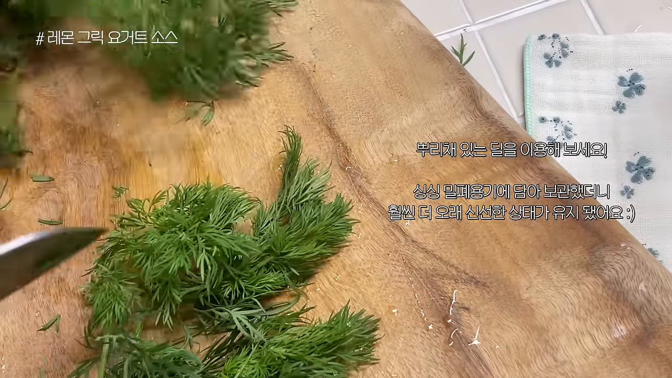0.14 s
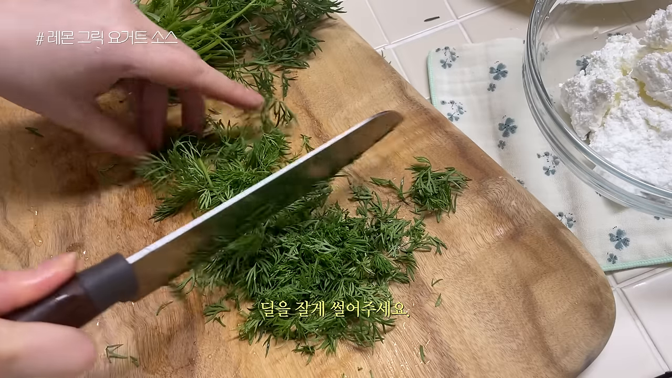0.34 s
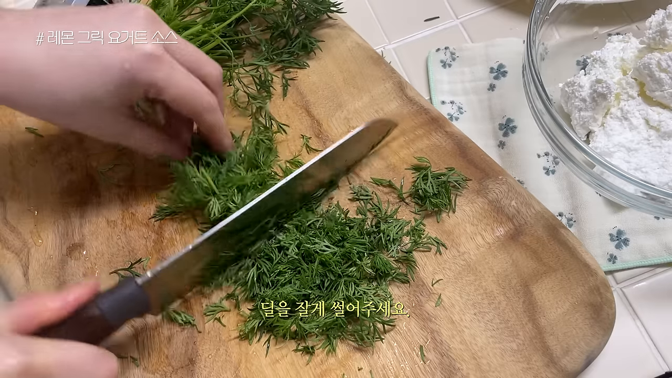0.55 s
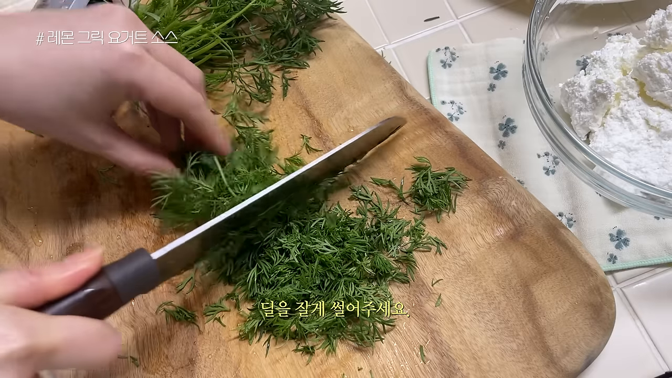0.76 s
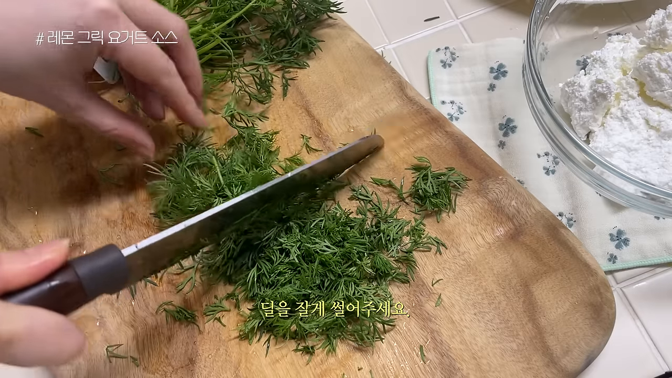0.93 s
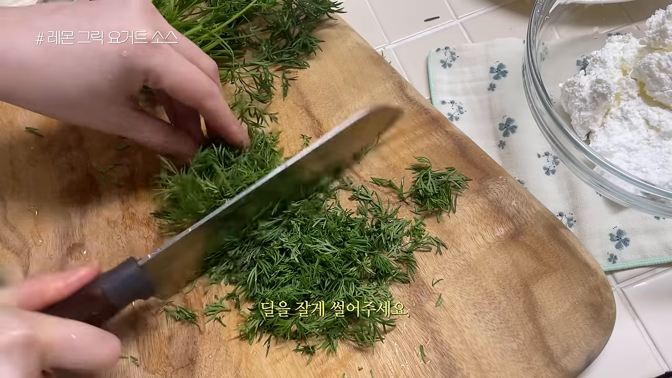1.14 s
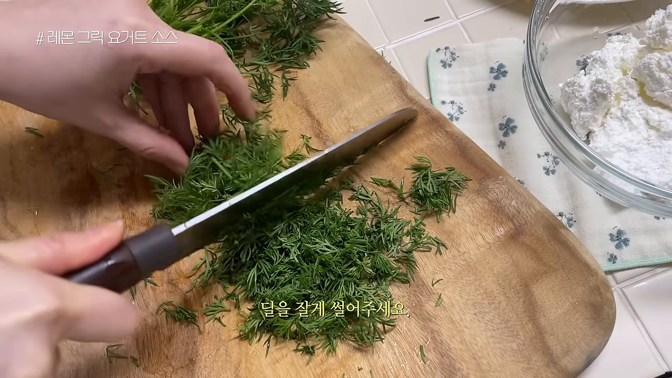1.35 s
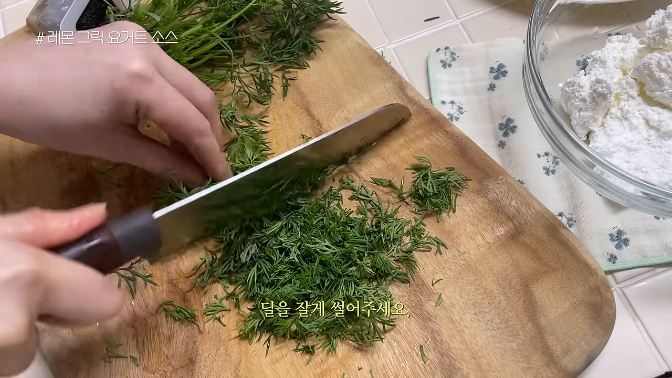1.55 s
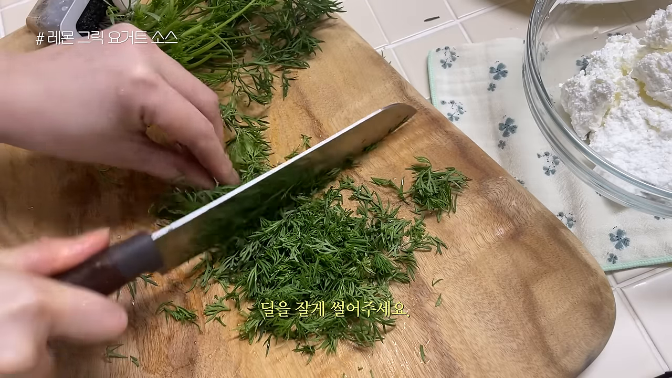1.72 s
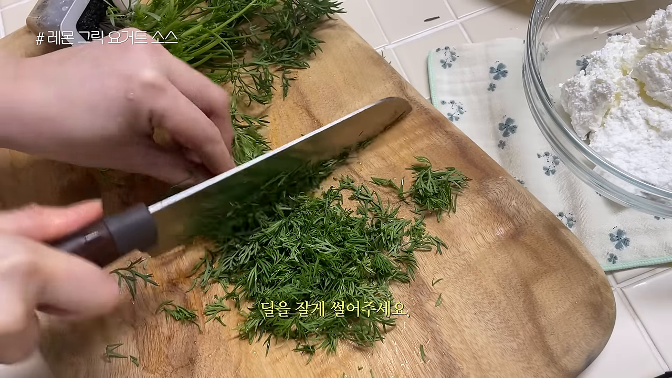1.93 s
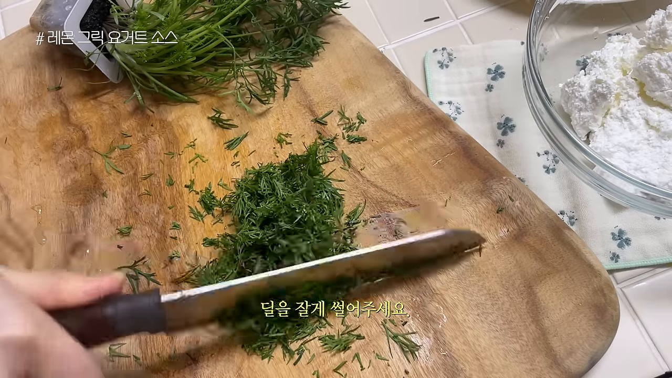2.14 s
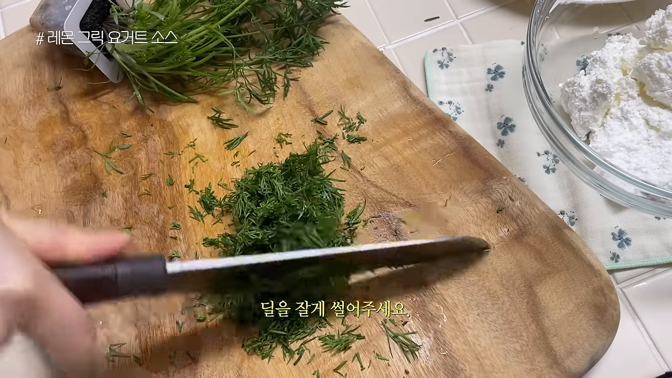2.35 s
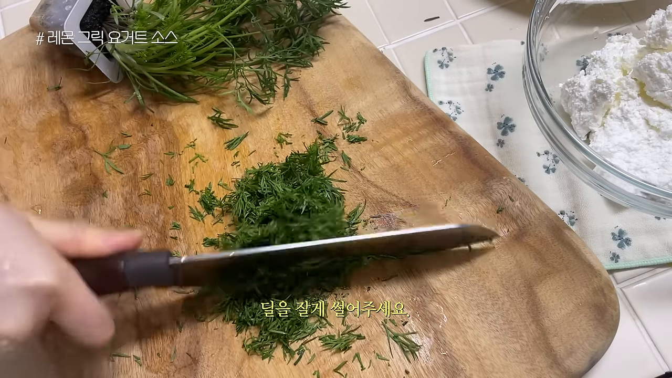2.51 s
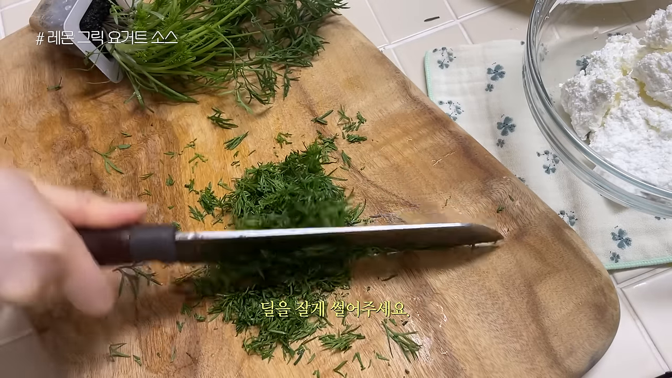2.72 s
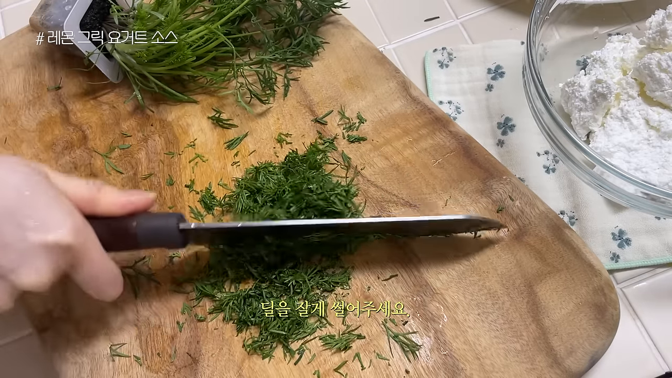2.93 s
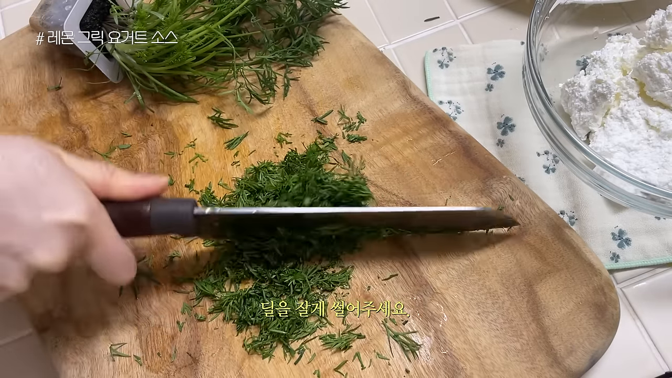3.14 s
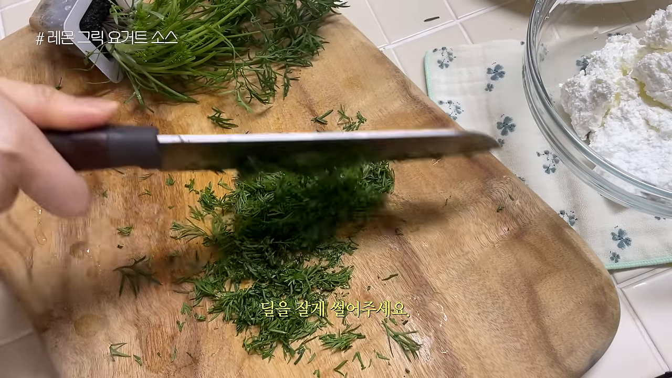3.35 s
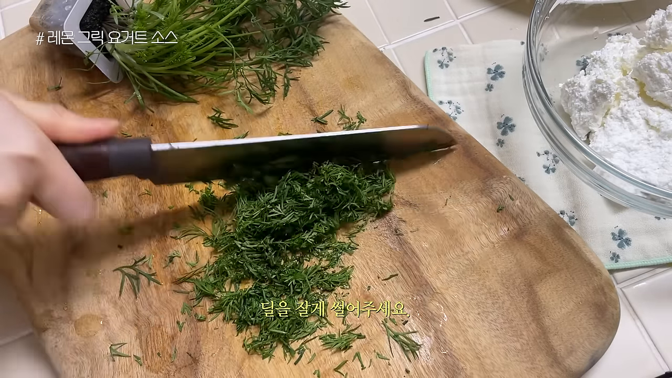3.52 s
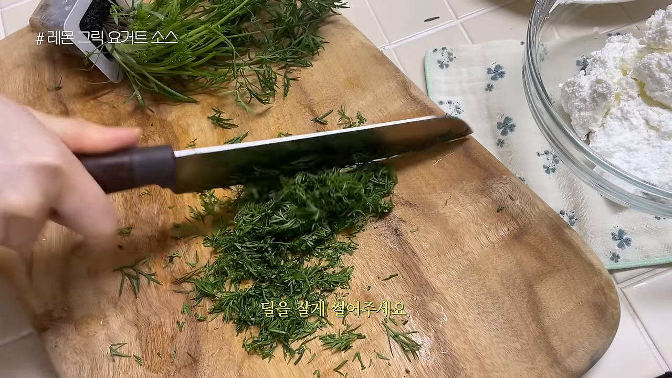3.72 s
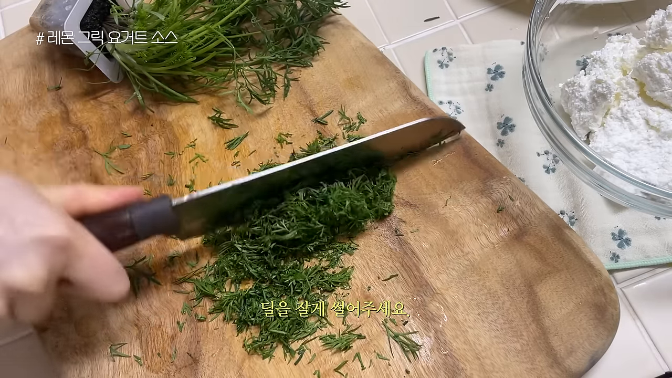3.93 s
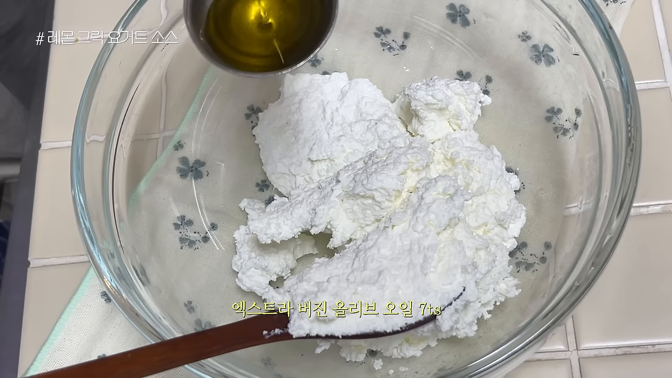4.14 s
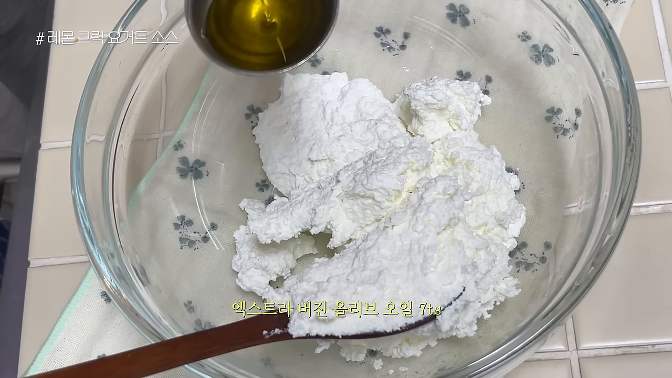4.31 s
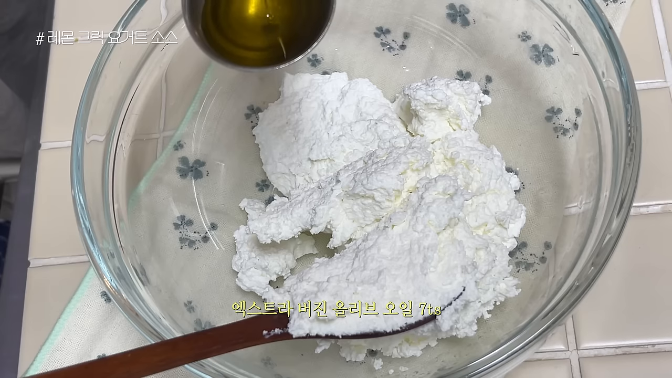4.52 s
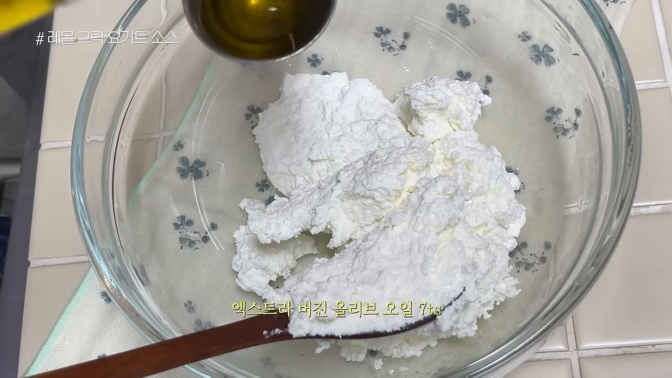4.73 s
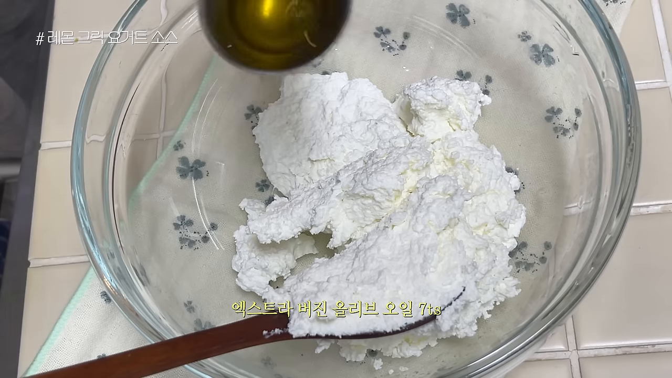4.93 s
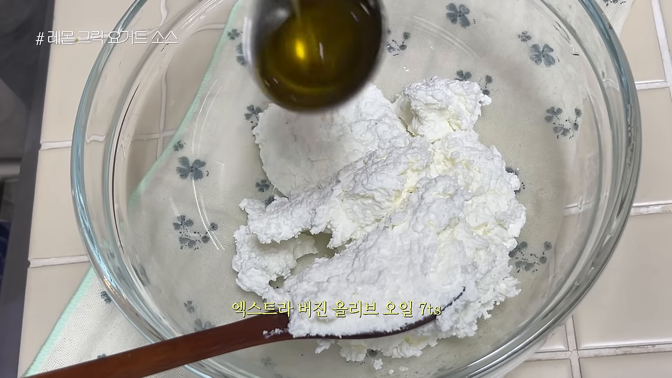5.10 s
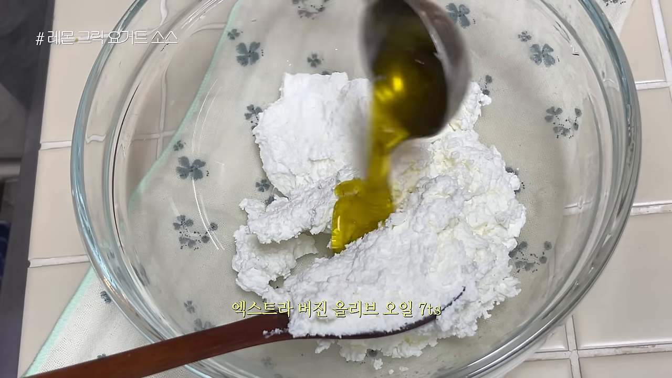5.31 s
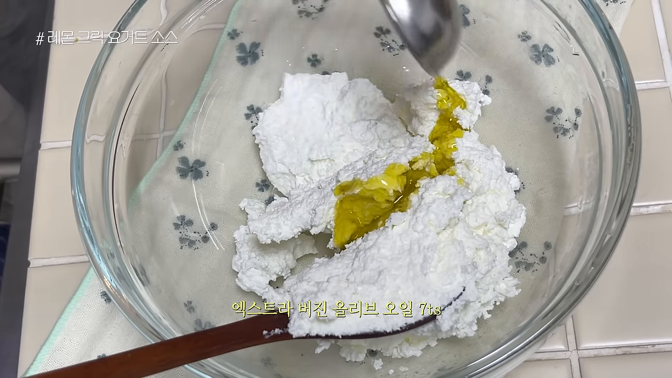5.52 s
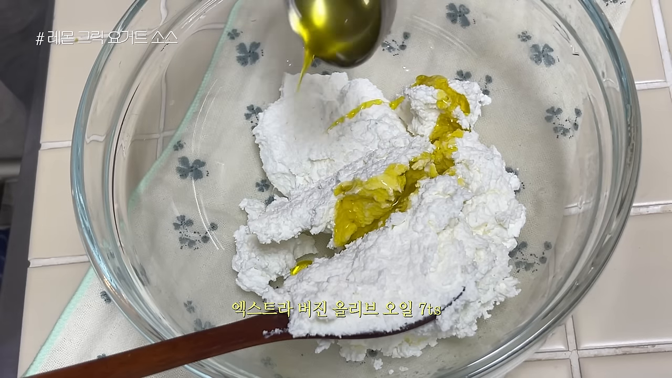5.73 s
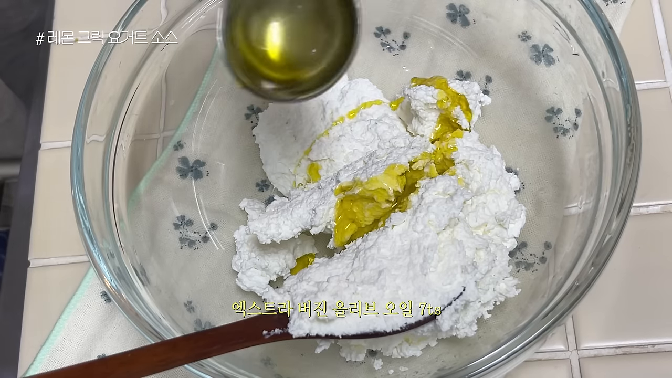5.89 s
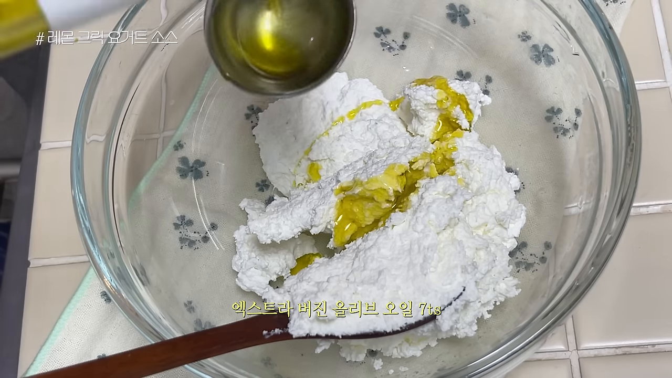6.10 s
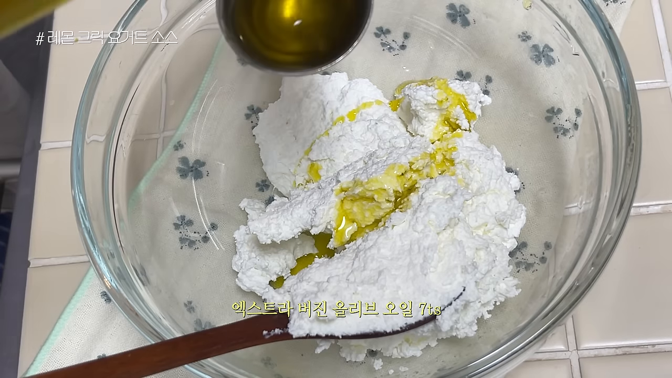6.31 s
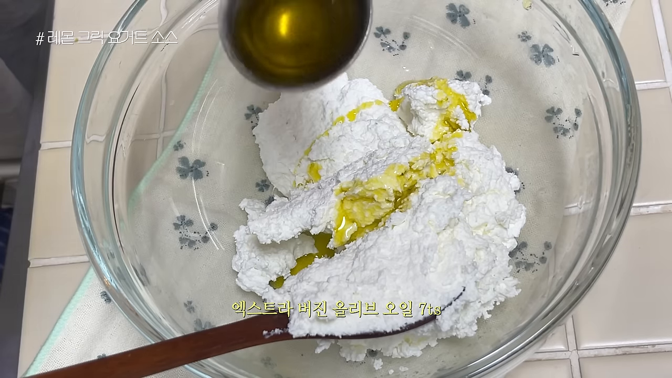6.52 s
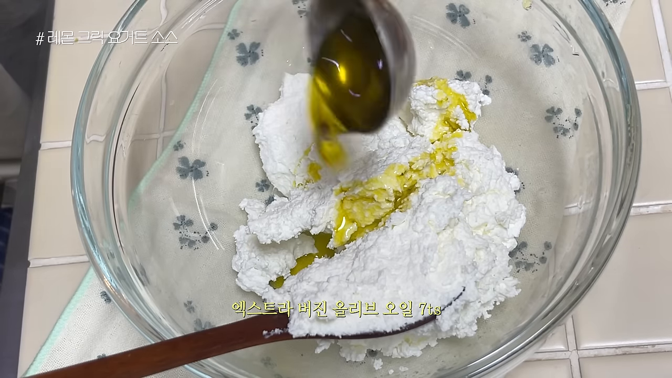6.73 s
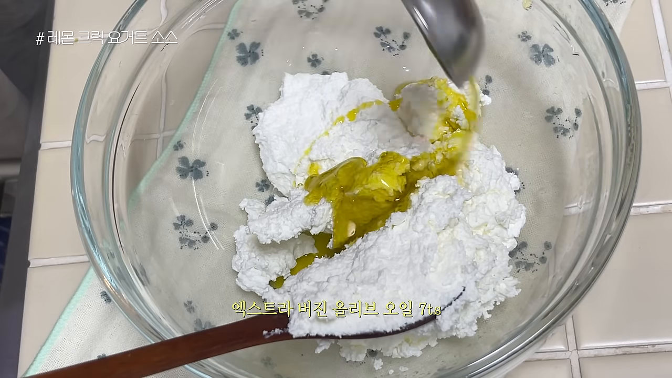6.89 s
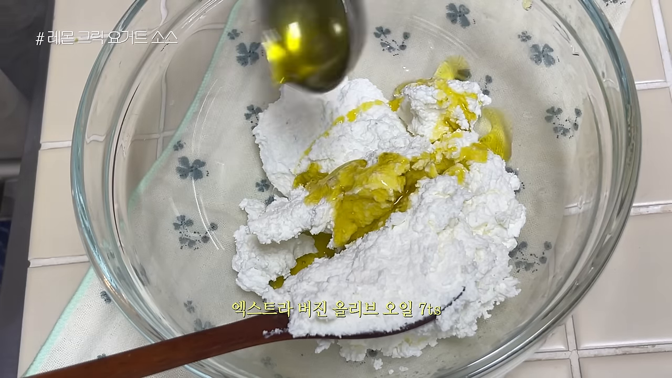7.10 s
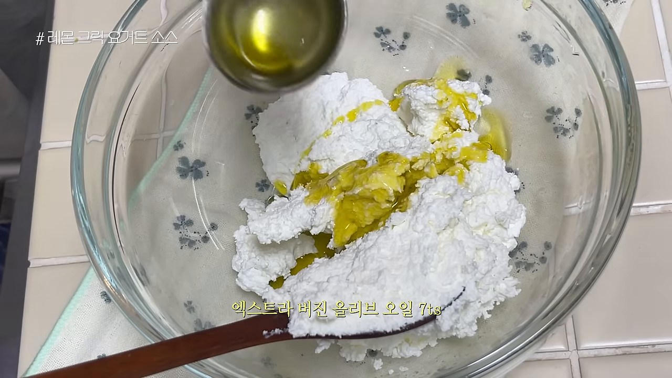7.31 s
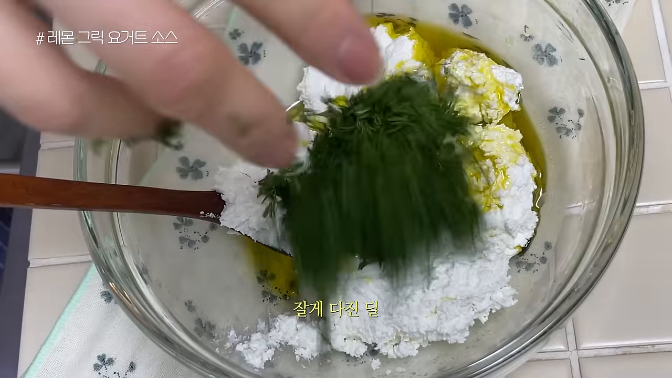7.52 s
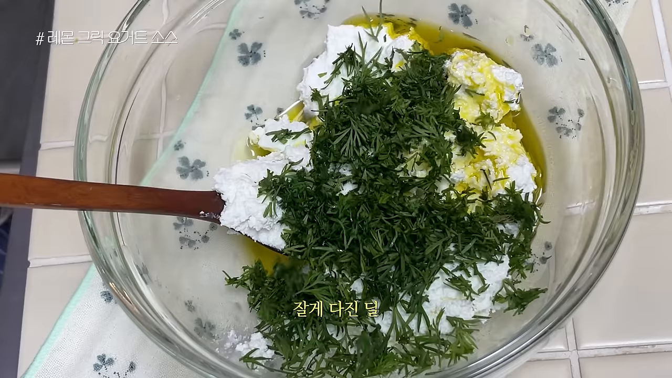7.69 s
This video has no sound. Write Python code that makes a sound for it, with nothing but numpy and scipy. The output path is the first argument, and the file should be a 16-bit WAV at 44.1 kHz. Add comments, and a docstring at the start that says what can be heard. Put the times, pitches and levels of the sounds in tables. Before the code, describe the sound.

A knife chops fresh herbs unevenly on a wooden board, then faint spoon tinks and oil gulps follow in a small kitchen.

```python
"""A kitchen knife chops dill on a wooden board: impacts excite the modes of blade and board, stems crunch
by fracture, and the wet edge squeaks once by stick-slip friction. The scene changes abruptly to oil
spooned onto yogurt: the spoon rings faintly, air gulps in the bottle neck and oil films burst; then herbs
are sprinkled. A small kitchen reverberates over dull room noise and, during the oil, a low hum.
Two closely spaced microphone ports hear it with differences of phase and level."""
import sys
import numpy as np
from scipy import signal
from scipy.fft import rfft, irfft, next_fast_len
from scipy.io import wavfile
from scipy.ndimage import map_coordinates

SR = 44100
rng = np.random.default_rng(int(sys.argv[2]) if len(sys.argv) > 2 else 0)


def int16_out(signal):
    """Quantize to a 16-bit WAV file."""
    q = np.round(np.clip(np.atleast_2d(signal).T, -1, 1) * 32767)
    wavfile.write(sys.argv[1], SR, q.astype(np.int16))


N = 341775
SCENE_CHANGE_S = 4.117

# steel meets wood: start_s, level_db, blade_db, thump_db, crack_db (the last three add to level_db)
BLOWS = [(0.128, -36, -15, -13.5, -0.5), (0.422, -8, -0.5, -27, -16.5), (0.885, -13, -5.5, -31, -19.5),
         (1.149, -16, -15, -12.5, -8), (1.668, -16, -15.5, -10.5, -6.5), (1.682, -30.5, -1.5, -3.5, -6.5),
         (1.703, -26.5, -13.5, -11.5, -17), (1.789, -32, -4, -5, -10), (1.84, -27.5, -9, -24, -26),
         (1.994, -20.5, -12.5, -8, -6), (2.018, -29, -23.5, -10, -13.5), (2.451, -20.5, -12, -36, -21.5),
         (3.076, -30, -10, -15.5, -11), (3.477, -9.5, 1.5, -22.5, -19.5)]
# strokes of the rocking knife: start_s, smack_db, sway_db, leaves_db
STROKES = [(1.475, -46, -64, -66), (1.588, -46, -64, -66), (2.135, -36.5, -48, -64.5),
           (2.338, -37.5, -45.5, -57), (2.571, -39.5, -48.5, -60), (2.745, -32.5, -45, -53),
           (2.966, -33.5, -44, -65), (3.162, -31.5, -47.5, -66.5), (3.716, -39.5, -48, -57),
           (3.987, -37, -46, -57.5)]
# frequency response of the board: frequency_hz, level_db
WOOD_SPECTRUM = [(90, -21), (230, -10.5), (450, -16), (620, -7.5), (950, 4), (1350, -15.5), (1620, -3.5),
                 (2050, -15), (2500, -16.5), (2900, -13.5), (3500, -25), (7000, -43.5), (15000, -68.5)]


def knife_blows():
    """Impact excites the normal modes of board and blade; the edge cracks and the stems beneath rattle as they
    crush."""
    # normal modes: pitch_hz, level_db, t60_s
    board_modes = [(530, -21.5, .04), (810, -10.5, 0.0079), (861.5, -2.5, 0.0421), (937.3, 2.5, 0.036),
                   (1091, -3.5, 0.043), (1361, -17.5, 0.018)]
    blade_modes = [(1557, -2.5, 0.022), (1606, 2, 0.048), (1713, -5, 0.034), (1962, -1.5, 0.017),
                   (2146, -13, .014), (4246, -16, 0.022), (4640, -24, 0.011)]
    thump_modes = [(88, -13, 0.14), (149.8, -9.5, 0.14), (235.2, -3, 0.11), (272.2, -5, 0.092),
                   (367, -10, 0.078), (424.8, -6.5, 0.055)]
    # spectra of the edge's contact and of the stems crushing after the blow: frequency_hz, level_db
    crack_spectrum = [(300, -11.5), (800, 4), (1300, -6.5), (2350, -2), (2600, -1), (2880, -2),
                      (3600, -15.5), (4250, -9), (5000, -16), (7500, -20), (10000, -21), (11800, -24.5),
                      (15500, -43.5)]
    chatter_spectrum = [(90, -24), (200, -2), (420, -3), (560, -11), (850, -1), (1350, -9.5), (2350, -5),
                        (2900, -8), (3600, -21.5), (7000, -31), (14000, -51)]
    out = np.zeros(N)
    for start_s, level_db, blade_db, thump_db, crack_db in BLOWS:
        board = ring(board_modes, attack_s=0.0007, scatter_db=1.5)
        blade = ring(blade_modes, attack_s=0.0005, scatter_db=1.2)
        thump = ring(thump_modes, attack_s=0.012, scatter_db=1.5)
        crack = signal.fftconvolve(burst(t60_s=0.034), impulse(crack_spectrum))
        crushes = burst(t60_s=0.2)
        crushes *= rng.random(len(crushes)) < 900 / SR  # about 900 crushing grains a second
        chatter = signal.fftconvolve(crushes, impulse(chatter_spectrum))
        add(out, start_s, amp(level_db + 1.5) * unit_peak(board))
        add(out, start_s, amp(level_db + blade_db - 6.5) * unit_onset(blade))
        add(out, start_s + 0.004, amp(level_db + thump_db - 1.5) * unit_onset(thump))
        add(out, start_s, amp(level_db + crack_db - 3) * unit_onset(crack))
        add(out, start_s + 0.003, amp(level_db + thump_db - 9) * unit_onset(chatter))
    return out


def stem_cuts():
    """Fracture under rising load: stems snap ever harder as the edge presses down, jolting the board."""
    # the edge shears a tuft: peak_s, squeeze_s, snap_db, board_db
    bites = [(0.12, 0.06, -55.5, -67), (0.563, 0.034, -34.5, -32.5), (1.145, 0.07, -46, -40.5),
             (1.24, 0.026, -58, -46), (1.666, 0.046, -50, -43), (1.994, 0.036, -43.5, -40.5),
             (2.09, 0.02, -60, -52.5), (2.265, 0.031, -54, -45), (2.389, 0.022, -54.5, -50.5),
             (2.456, 0.015, -34.5, -28.5), (2.676, 0.022, -43.5, -34), (2.8, 0.026, -52, -49.5),
             (2.89, 0.03, -41.5, -36), (3.08, 0.01767, -39.5, -31), (3.197, 0.02, -60, -55.5),
             (3.594, 0.023, -40.5, -35), (3.895, 0.03, -42.5, -37), (4.112, 0.012, -44, -43.5)]
    # spectrum of snapping stems: frequency_hz, level_db
    snap_spectrum = [(1500, -33), (2900, -5.5), (3600, -14.5), (4400, -7.5), (5600, -8.5), (8000, -8),
                     (9700, -7), (10700, -3), (11750, 0), (12600, -11.5), (13500, -20.5), (15800, -21.5)]
    settle_s, settle_db = 0.046, -13  # a later, weaker jolt as the edge settles on the wood
    t, snapping, jolts = clock(), np.zeros(N), np.zeros(N)
    for peak_s, squeeze_s, snap_db, board_db in bites:
        near = slice(max(int((peak_s - 0.2) * SR), 0), int((peak_s + 0.1) * SR))
        before_s, after_s = np.maximum(peak_s - t[near], 0), np.maximum(t[near] - peak_s, 0)
        snapping[near] += amp(snap_db - 16 * (before_s / squeeze_s) ** 1.5 - 60 * after_s / 0.04)
        jolt = amp(board_db - 32 * before_s / squeeze_s - 60 * after_s / 0.0441)
        jolts[near] += jolt
        add(jolts, t[near][0] + settle_s, amp(settle_db) * jolt)
    clumps = amp(3.5 * wander(rate_hz=400))  # fractures cluster stem by stem
    snaps = coloured(snapping * unit_rms(clumps * grains(rate_hz=4500, spread_db=1)), snap_spectrum)
    board = coloured(jolts * unit_rms(clumps * grains(rate_hz=4700, spread_db=0.5)), WOOD_SPECTRUM)
    return amp(2.5) * snaps + amp(4) * board


def leaf_rustle():
    """Friction of fingers and blade on leaves gives random impulses; a few thicker stems fracture."""
    # spectrum of the leaves: frequency_hz, level_db
    leaf_spectrum = [(300, -8), (950, 7), (1300, -6), (1600, 5.5), (2300, -11.5), (2980, -1.5),
                     (3500, -16.5), (4300, -12.5), (8000, -19.5), (12000, -17.5), (14000, -35)]
    # single stems snap: start_s, level_db, pitch_hz
    stems = [(0.937, -50, 11450), (1.172, -31.5, 6300), (1.649, -34.5, 6996), (1.655, -30.5, 11580),
             (1.979, -23, 8390)]
    gathering = amp(-64.5) * swell(0.28, rise_s=0.0149, hold_s=0.16, t60_s=0.15)
    dragging = sum(amp(leaves_db + 1) * swell(start_s, rise_s=0.05, hold_s=0.1, t60_s=0.25)
                   for start_s, _, _, leaves_db in STROKES)
    out = (gathering + dragging) * unit_rms(coloured(grains(rate_hz=1400, spread_db=3), leaf_spectrum))
    for start_s, level_db, pitch_hz in stems:
        add(out, start_s, amp(level_db) * tick(pitch_hz))
    return out


def blade_lifts():
    """Adhesion fails: the wet film releases the blade with a falling smack and the board springs back."""
    out = np.zeros(N)
    for start_s, smack_db, _, _ in STROKES:
        start_hz = 1650 * np.exp(rng.normal(0, 0.08))
        smack = chirp(start_hz, end_hz=420, glide_s=0.005, t60_s=0.035, attack_s=0.002)
        tap = unit_peak(signal.fftconvolve(burst(t60_s=0.03), impulse(WOOD_SPECTRUM)))
        add(out, start_s, amp(smack_db - 5) * smack)
        add(out, start_s, amp(smack_db - 2.5) * tap)
    return out


def edge_squeak():
    """Stick-slip friction: uneven, quickening slips drive the resonances of blade and board."""
    # the edge slides on the wood: time_s, slip_rate_hz, level_db
    slide = [(2.809, 350, -45.5), (2.813, 355, -24.5), (2.819, 360, -20.5), (2.825, 364, -23),
             (2.831, 400, -17.5), (2.835, 410, -33), (2.841, 470, -66)]
    # resonances: pitch_hz, level_db, t60_s
    modes = [(374.6, -12.5, 0.022), (743.6, -8.5, 0.015), (1057, 1.0, 0.023),
             (1459, 3.5, 0.012), (1570, -1.5, 0.038), (2848, -12, 0.023)]
    slip_rate_hz, level_db = curves(slide)
    sliding = (clock() > slide[0][0]) & (clock() < slide[-1][0])
    uneven_hz = slip_rate_hz * (1 + 0.025 * wander(rate_hz=300)) * sliding
    slips = np.diff(np.floor(np.cumsum(uneven_hz) / SR), prepend=0)  # one impulse a cycle
    response = ring(modes, attack_s=0.0004, scatter_db=1)
    return amp(19.5) * signal.fftconvolve(slips * amp(level_db), response / np.linalg.norm(response))[:N]


def table_vibration():
    """Forced vibration: strokes, blows and resting hands sway the table's lowest mode and rumble it."""
    # frequency response of the table: frequency_hz, level_db
    rumble_spectrum = [(30, -41), (62, -11), (88, 4), (120, -7), (150, -1), (190, -9.5), (230, -6),
                       (320, -18.5), (600, -41), (2000, -110)]
    rocking = sum(amp(sway_db) * swell(start_s, rise_s=0.032, hold_s=0.11, t60_s=0.3)
                  for start_s, _, sway_db, _ in STROKES)
    jolts = sum(amp(level_db + thump_db) * swell(start_s, rise_s=0.008, hold_s=0.012, t60_s=0.2)
                for start_s, level_db, _, thump_db, _ in BLOWS)
    hands = swell(0, rise_s=0.4, hold_s=SCENE_CHANGE_S, t60_s=0.1)
    sway = unit_rms(amp(1.8 * wander(rate_hz=19)) * sine(pitch_hz=54 + 3 * wander(rate_hz=16)))
    rumble = unit_rms(coloured(grains(rate_hz=270, spread_db=1), rumble_spectrum))
    sway_gain = amp(-0.5) * rocking + amp(-25) * jolts + amp(-64) * hands
    rumble_gain = amp(-8.5) * rocking + amp(-21) * jolts + amp(-59.5) * hands
    return sway_gain * sway + rumble_gain * rumble


def spoon():
    """Contact excites free vibration: the spoon scuffs, tinks and sings against the bottle's lip."""
    # normal modes of the spoon: pitch_hz, level_db, t60_s
    spoon_modes = [(2520, -14, .07), (3880, -11, .07), (4800, -5, .1), (5300, 7, 0.076), (5850, 9, 0.061),
                   (6760, 2, 0.086), (10500, 16, 0.11), (10600, 1, 0.16), (10700, -5, .1), (10870, -2, .1),
                   (10700, -5, .09)]
    # light touches: start_s, ring_db, brightest_hz, scuff_db
    touches = [(5.051, -47, 10340, -34), (6.149, -54, 4400, -40), (6.52, -59, 6500, -53)]
    # gliding tones at the lip: start_s, level_db, start_hz, end_hz, t60_s
    sings = [(5.053, -71, 2692, 2600, 0.11), (6.178, -62, 2750, 2500, .06), (6.521, -59, 4920, 4660, 0.14),
             (6.521, -62, 5740, 5500, 0.1), (6.570, -72, 2490, 2616, .22)]
    out = np.zeros(N)
    for start_s, ring_db, brightest_hz, scuff_db in touches:
        # excitation falls 12 dB an octave either side of brightest_hz
        modes = [(hz, db - 12 * abs(np.log2(hz / brightest_hz)), t60_s) for hz, db, t60_s in spoon_modes]
        scuff_spectrum = [(700, -20), (brightest_hz / 2, -15), (brightest_hz, 0),
                          (11500, -12), (14000, -32)]
        tink = ring(modes, attack_s=0.0004, scatter_db=1.5)
        scuff = signal.fftconvolve(burst(t60_s=0.024), impulse(scuff_spectrum))
        add(out, start_s, amp(ring_db) * unit_peak(tink))
        add(out, start_s, amp(scuff_db) * unit_peak(scuff))
    for start_s, level_db, start_hz, end_hz, t60_s in sings:
        tone = chirp(start_hz, end_hz, glide_s=0.0406, t60_s=t60_s, attack_s=0.0027)
        add(out, start_s, amp(level_db) * tone)
    return out


def oil():
    """Thin oil films rupture with ticks; air gulps in the bottle neck as damped, gliding oscillations."""
    # bursting films: start_s, level_db, pitch_hz
    films = [(4.2584, -52.5, 6570), (4.559, -53, 6690), (4.7471, -62, 6000), (5.3082, -49, 5940),
             (5.3316, -52, 5810), (5.3916, -54, 5770), (5.5428, -59, 5770), (6.1776, -50.5, 2530),
             (6.2622, -42.5, 6000), (6.5867, -41.5, 7700), (6.6237, -53.5, 7060), (6.8163, -57, 2314),
             (7.0626, -54.5, 10650)]
    # gulps of air: start_s, level_db, start_hz, end_hz, t60_s
    glugs = [(6.149, -50.5, 1180, 737, 0.092), (6.151, -44, 265, 169, 0.084), (6.177, -50.5, 676, 723, 0.1),
             (6.519, -52.5, 520, 486, 0.17), (6.520, -61.5, 945, 1010, 0.28)]
    out = np.zeros(N)
    for start_s, level_db, pitch_hz in films:
        add(out, start_s, amp(level_db - 2) * tick(pitch_hz))
    for start_s, level_db, start_hz, end_hz, t60_s in glugs:
        glug = chirp(start_hz, end_hz, glide_s=0.012, t60_s=t60_s, attack_s=0.00086)
        add(out, start_s, amp(level_db) * glug)
    return out


def herb_sprinkle():
    """Shot noise: chopped dill rustles out of the fingers, first a clump, then a fading trickle."""
    # spectrum of the sprinkled dill: frequency_hz, level_db
    rustle_spectrum = [(300, -9), (900, -3), (1700, 0), (3000, -8.5), (5000, -6), (7500, -4.5), (11000, 0),
                       (13500, -25)]
    start_s, fall_db_per_s = 7.532, 26
    trickle = swell(start_s, rise_s=0.005, hold_s=0, t60_s=60 / fall_db_per_s)
    clump = amp(3.5) * swell(start_s, rise_s=0.005, hold_s=0, t60_s=0.12)
    rustle = unit_rms(coloured(grains(rate_hz=1700, spread_db=2), rustle_spectrum))
    return amp(-62.5) * (trickle + clump) * rustle


def room_tail(size=SR * 3 // 4):
    """Diffuse reverberation: each frequency decays exponentially at its own rate."""
    # reverberation time of the kitchen: frequency_hz, t60_s
    decay_times = [(100, 0.27), (300, 0.58), (900, 0.62), (1700, 0.66), (4500, 0.41), (12000, .33)]
    # spectrum of the reflections: frequency_hz, level_db
    echo_spectrum = [(60, -22.5), (130, -12.5), (300, -3.5), (900, -14.5), (1700, -13.5), (2900, -13),
                     (4300, -8), (6500, -9.5), (12000, -15), (14500, -24)]
    hz, t, noise = signal.stft(rng.standard_normal(size), SR, nperseg=256)
    decay = amp(-60 * t / along(decay_times, hz)[:, None]) * (1 - np.exp(-t / 0.0044))
    band_energy = np.sum(decay ** 2, axis=1, keepdims=True) * 128  # 128 samples a hop
    decay *= amp(along(echo_spectrum, hz))[:, None] / np.sqrt(band_energy)
    return signal.istft(noise * decay, SR, nperseg=256)[1]


def in_kitchen(x, wet_db, block=SR // 2):
    """Superposition of direct sound and a tail that varies as the hands move and between the channels."""
    out = np.array([x, x])
    for start in range(0, N, block):
        piece = amp(wet_db) * x[start:start + block]
        mid, side = (signal.fftconvolve(piece, room_tail()) for _ in range(2))
        add(out[0], start / SR, mid + 0.35 * side)
        add(out[1], start / SR, mid - 0.56 * side)
    return out


def hum():
    """Amplitude and frequency modulation: a low tone wavers, swells three times and stops."""
    # swells of the hum: peak_s, level_db, rise_s
    crests = [(4.8, -54, 0.48), (5.31, -55.5, .12), (6.0, -54, 0.15)]
    pitch_hz, end_s = 188, 6.28
    steady = amp(-62) * swell(SCENE_CHANGE_S, rise_s=0.0089, hold_s=end_s - SCENE_CHANGE_S, t60_s=0.46)
    swells = sum(amp(level_db) * swell(peak_s - rise_s, rise_s, hold_s=0.023, t60_s=0.3)
                 for peak_s, level_db, rise_s in crests)
    tone = unit_rms(sine(pitch_hz + 1.65 * wander(rate_hz=9.5)))
    return (steady * amp(3.2 * wander(rate_hz=12)) + swells) * tone


def room_noise():
    """Partly coherent noise, mostly common to both channels; it steps up at the bowl and slowly sinks."""
    # spectrum of the dull background: frequency_hz, level_db
    noise_spectrum = [(15, -34), (25, -3), (60, 3), (139, -4), (257, -3.5), (515, -18), (811, -15.5),
                      (1810, -28), (2130, -33.5), (4750, -50), (7280, -42), (9270, -55.5), (10000, -36.5),
                      (11200, -42.5), (15000, -70)]
    at_board_db, at_bowl_db, fall_db_per_s = -61.5, -55, 1.93
    since_s = clock() - SCENE_CHANGE_S
    shared, left, right = (unit_rms(coloured(rng.standard_normal(N), noise_spectrum)) for _ in range(3))
    level_db = np.where(since_s > 0, at_bowl_db - fall_db_per_s * since_s, at_board_db)
    return amp(level_db) * (shared + 0.5 * np.array([left, right]))


def ring(modes, attack_s, scatter_db):
    """Modal superposition: damped sines of scattered strength, slightly retuned by the grip."""
    t = clock(SR // 2) * np.exp(rng.normal(0, 0.01))
    tones = [amp(db + rng.normal(0, scatter_db) - 60 * t / t60_s) * np.sin(2 * np.pi * hz * t)
             for hz, db, t60_s in modes]
    return sum(tones) * (1 - np.exp(-t / attack_s))


def chirp(start_hz, end_hz, glide_s, t60_s, attack_s):
    """A damped oscillation whose pitch glides exponentially, peak 1."""
    t = clock(SR // 3)
    pitch_hz = end_hz + (start_hz - end_hz) * np.exp(-t / glide_s)
    return unit_peak(sine(pitch_hz) * amp(-60 * t / t60_s) * (1 - np.exp(-t / attack_s)))


def tick(hz):
    """A noise burst through one resonance: a short wet snap, peak 1."""
    resonance = impulse([(hz / 3, -38), (hz / 1.25, -16), (hz, 0), (hz * 1.25, -16), (hz * 2.6, -48)])
    return unit_peak(signal.fftconvolve(burst(t60_s=0.014), resonance))


def burst(t60_s, size=SR // 2):
    """Exponentially decaying white noise."""
    return rng.standard_normal(size) * amp(-60 * clock(size) / t60_s)


def grains(rate_hz, spread_db):
    """A Poisson train of impulses of random sign and size, rms 1."""
    impulses = (rng.random(N) < rate_hz / SR) * np.sign(rng.standard_normal(N))
    return unit_rms(impulses * amp(spread_db * np.clip(rng.standard_normal(N), -2, 2)))


def sine(pitch_hz):
    """A tone whose phase is the integral of its frequency."""
    return np.sin(2 * np.pi * np.cumsum(pitch_hz) / SR)


def swell(start_s, rise_s, hold_s, t60_s):
    """An envelope: linear rise to 1, hold, exponential decay."""
    t = clock() - start_s
    return np.clip(t / rise_s, 0, 1) * amp(-60 * np.maximum(t - rise_s - hold_s, 0) / t60_s)


def wander(rate_hz):
    """A smooth random curve with rate_hz knots a second."""
    return map_coordinates(rng.standard_normal(int(N * rate_hz / SR) + 4), [clock() * rate_hz])


def impulse(spectrum, size=8192):
    """Minimum-phase impulse response with the given spectrum, energy 1."""
    cepstrum = irfft(np.log(amp(along(spectrum, np.fft.rfftfreq(size, 1 / SR)))))
    cepstrum[1:size // 2] *= 2
    cepstrum[size // 2 + 1:] = 0
    response = irfft(np.exp(rfft(cepstrum)))
    return response / np.linalg.norm(response)


def coloured(x, spectrum):
    """Convolution of x with a body of the given spectrum."""
    return signal.fftconvolve(x, impulse(spectrum))[:N]


def filtered(x, response):
    """The spectrum of x times a complex frequency response."""
    size = next_fast_len(N + SR // 2)
    return irfft(rfft(x, size) * response(np.fft.rfftfreq(size, 1 / SR)), size)[..., :N]


def amp(db):
    """Decibels to gain."""
    return 10 ** (np.asarray(db) / 20)


def unit_rms(x):
    """x at rms 1."""
    return x / np.sqrt(np.mean(x ** 2) + 1e-20)


def unit_peak(x):
    """x at peak 1."""
    return x / np.abs(x).max()


def unit_onset(x):
    """x at rms 1 over its first 23 ms."""
    return x / np.sqrt(np.mean(x[:1024] ** 2))


def clock(size=N):
    """Time in seconds of each sample."""
    return np.arange(size) / SR


def along(points, hz):
    """(frequency_hz, value) points read on a log axis."""
    knots_hz, values = np.transpose(points)
    return np.interp(np.log(hz + 1), np.log(knots_hz + 1), values)


def curves(rows):
    """One value per sample for each column after the time."""
    time_s, *columns = np.transpose(rows)
    return [np.interp(clock(), time_s, column) for column in columns]


def add(track, start_s, sound):
    """Mix a sound into the track at start_s."""
    part = track[max(round(start_s * SR), 0):][:len(sound)]
    part += sound[:len(part)]


def scene():
    """Superposition: chopping, then oil and herbs, over the room's background."""
    knife = knife_blows() + stem_cuts() + leaf_rustle() + blade_lifts() + edge_squeak()
    at_board = in_kitchen(knife, wet_db=-0.34) + table_vibration()
    at_bowl = in_kitchen(spoon() + oil() + herb_sprinkle(), wet_db=-2.5)
    return at_board * (clock() < SCENE_CHANGE_S) + at_bowl + room_noise() + hum()


def record(dry):
    """Two ports differ in phase and level; band limits trim the extremes and saturation rounds peaks."""
    # phase difference of the ports: frequency_hz, left_lead_rad
    port_phase = [(0, 0), (780, 0.5), (1380, -0.1), (2840, 0.7), (4130, 0.7), (4820, 1.8), (5430, 4.7),
                  (5860, 6.1), (6800, 6.8), (9040, 9.3), (10200, 9.7), (12600, 12.3), (14500, 12.8),
                  (15800, 14.5)]
    # level difference of the ports: frequency_hz, left_minus_right_db
    port_balance = [(60, -0.5), (110, -0.5), (200, -2.0), (380, -3.0), (700, -2.0), (1290, 0.5),
                    (2380, 0.0), (4400, -0.5), (8120, 0.0), (15000, 0.0)]
    bass_hz, top_hz, ceiling = 33, 15850, 0.95
    sides = np.array([[0.5], [-0.5]])

    def ports(hz):
        """Each port takes half of each difference, with opposite signs."""
        lead_rad = np.interp(hz, *np.transpose(port_phase))
        return amp(sides * along(port_balance, hz)) * np.exp(1j * sides * lead_rad)

    bass_cut = signal.butter(2, bass_hz, "highpass", fs=SR, output="sos")
    heard = signal.sosfilt(bass_cut, filtered(dry, ports))
    rounded = heard / (1 + np.abs(heard / ceiling) ** 6) ** (1 / 6)
    return filtered(rounded, lambda hz: hz < top_hz)


dry = scene()
out = record(dry)
int16_out(out)
```